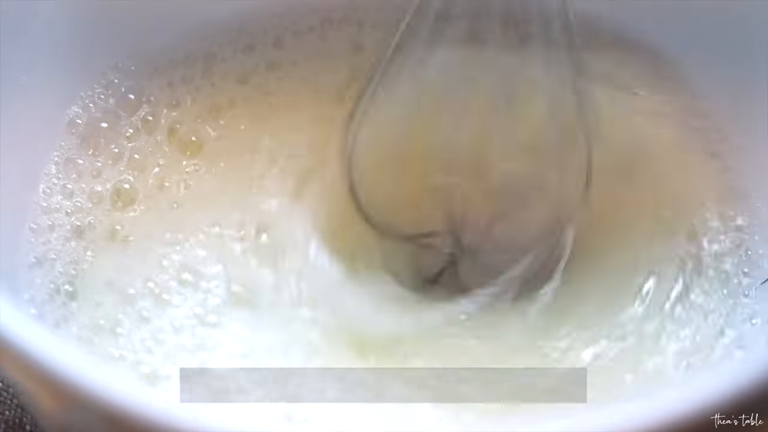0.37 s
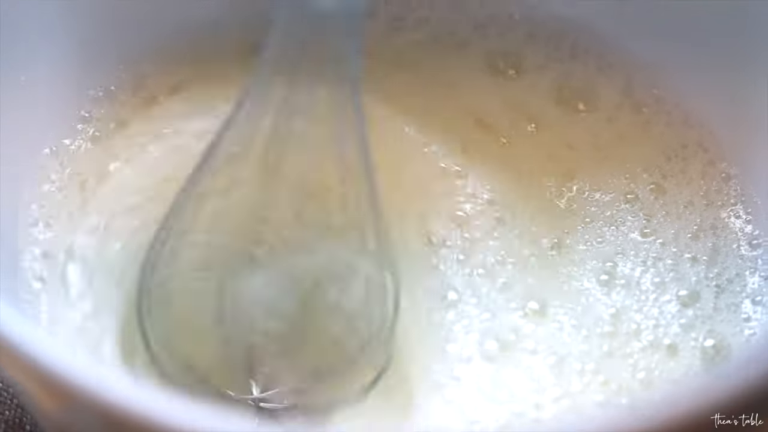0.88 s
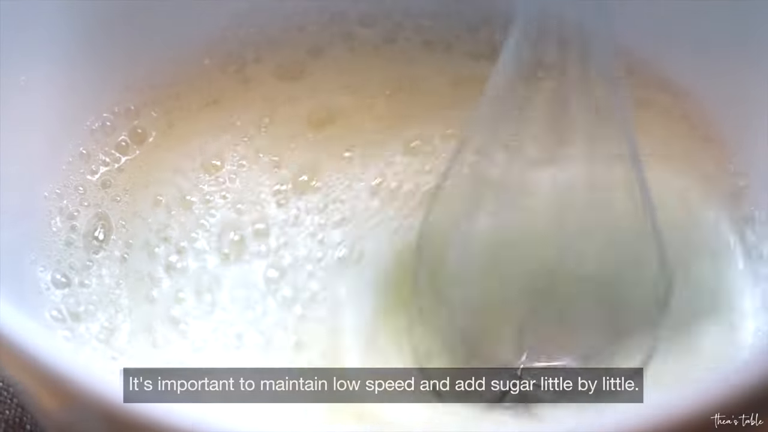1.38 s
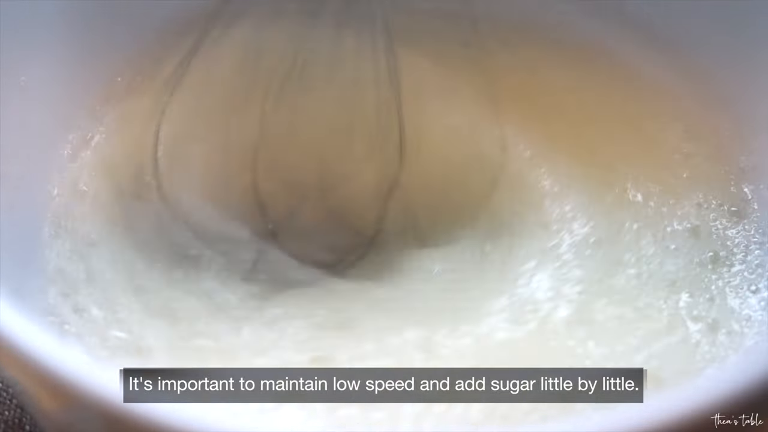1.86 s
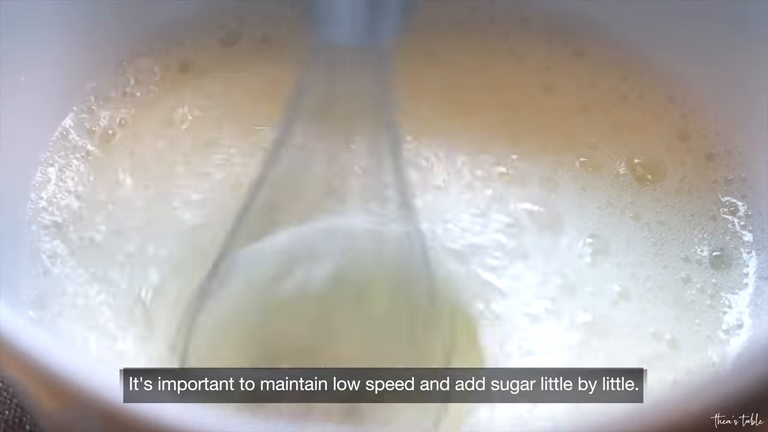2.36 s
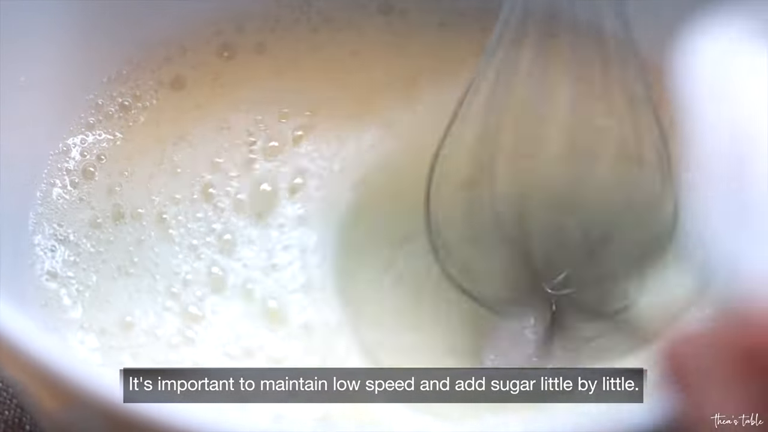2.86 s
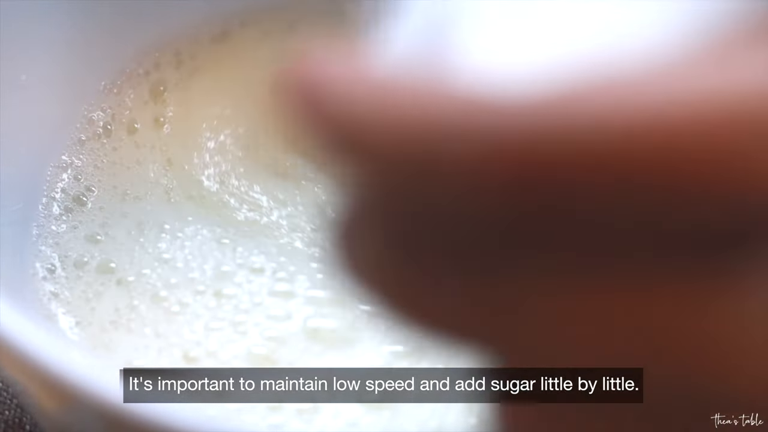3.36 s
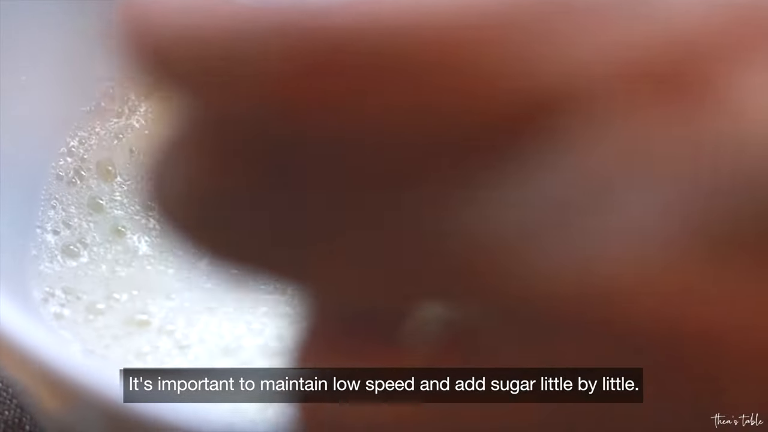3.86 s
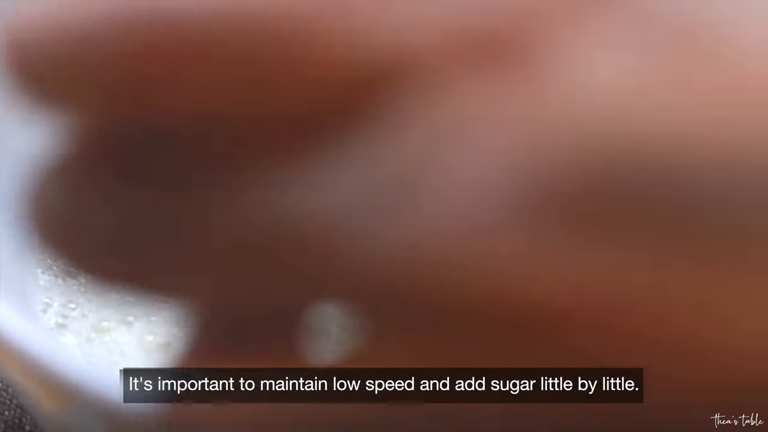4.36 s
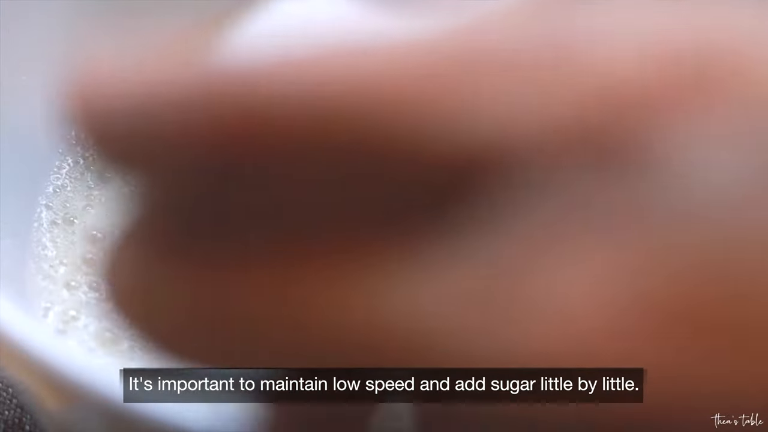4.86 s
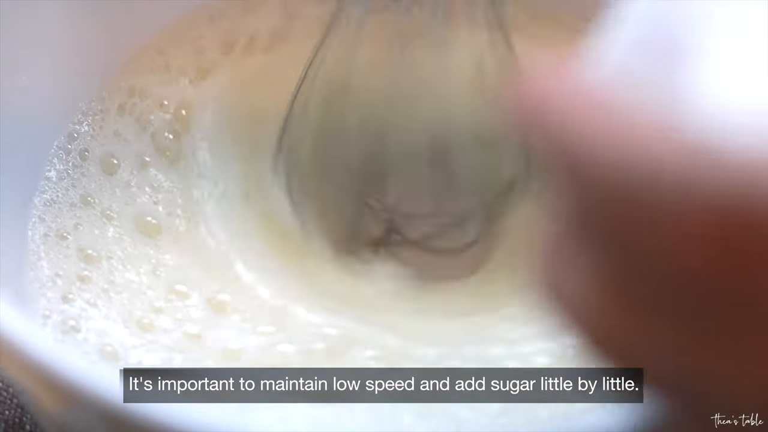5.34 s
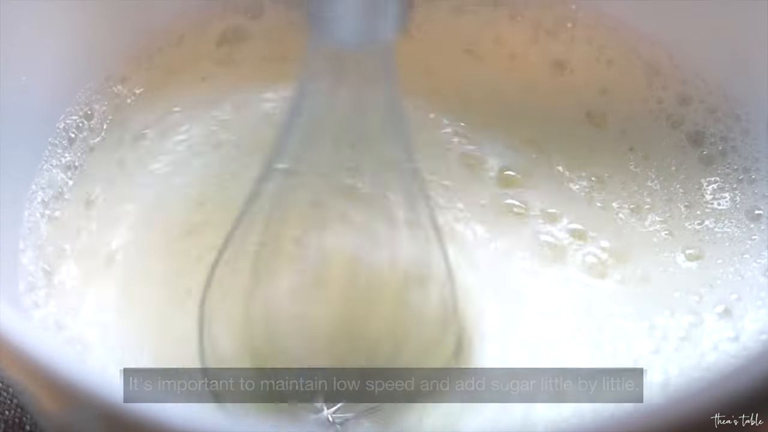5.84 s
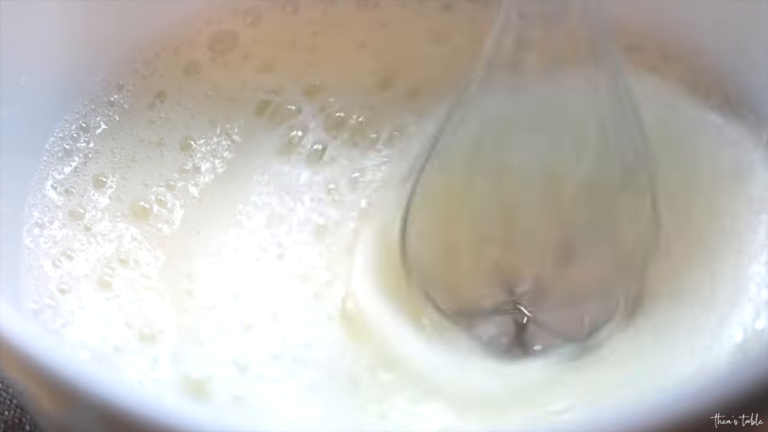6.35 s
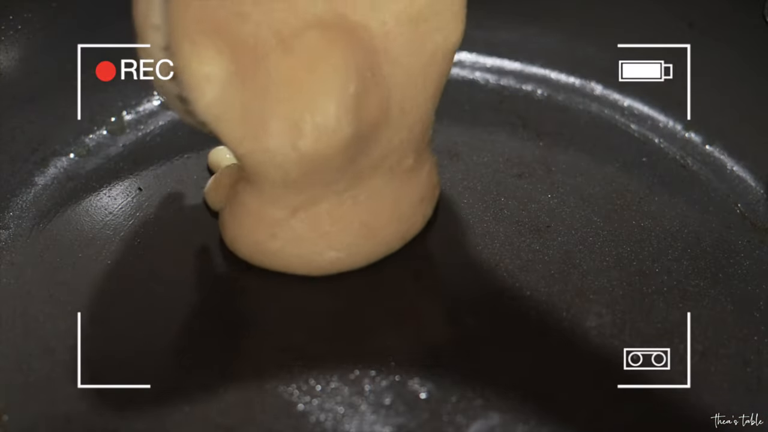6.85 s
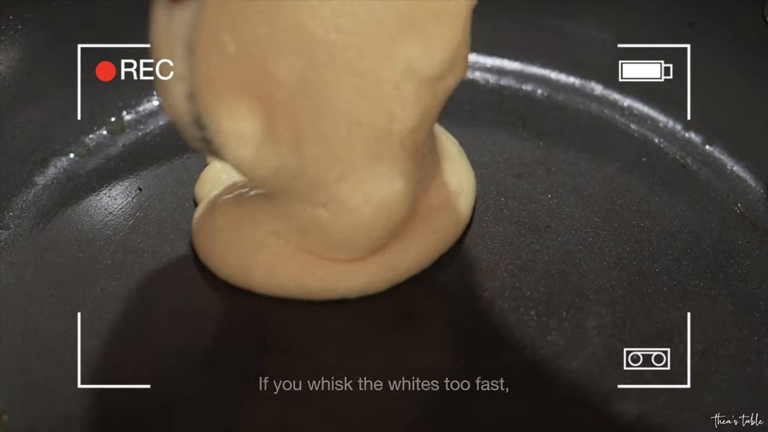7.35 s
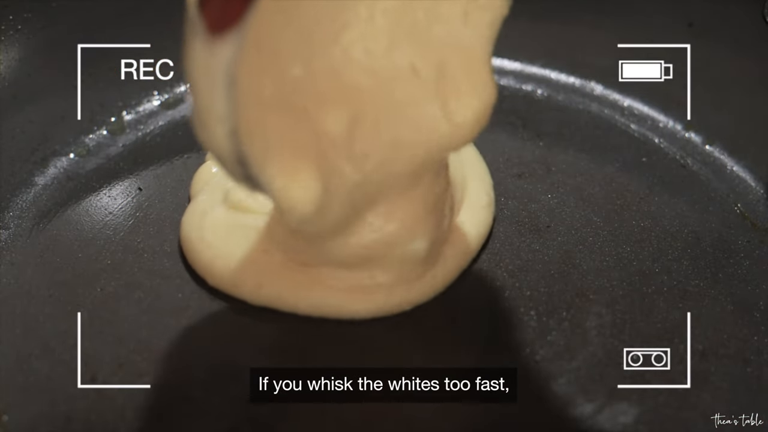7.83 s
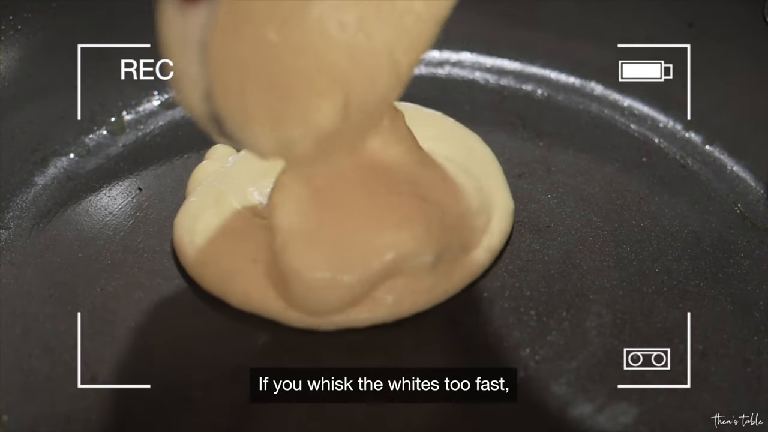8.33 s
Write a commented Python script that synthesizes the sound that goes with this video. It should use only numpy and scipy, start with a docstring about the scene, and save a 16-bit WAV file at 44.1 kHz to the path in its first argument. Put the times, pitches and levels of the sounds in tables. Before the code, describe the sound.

A single close microphone without reverberation picks up a hand mixer beating egg white. Whisk wires strike and drag along the bowl in a fast fluttering rhythm, ringing thin and bright, above a nasal motor whine that dips slightly under load and foamy, gritty liquid noise. Contacts are harder early, gentler in the middle, then firmer briefly. The mixer slowly fades beneath another room's low rumble, and a tiny hiss follows.

```python
"""Hand mixer in a bowl of egg white

Kitchen, one mono microphone, with no added distance or reverberation. An electric hand mixer spins a wire whisk
about 13 turns a second: four wires strike and drag along the wall each turn, as noise bursts that ring resonators
for wires, bowl and motor housing. The motor's whine and gear are sines swelling with the load; the churned liquid
is gritty noise. The kitchen's rumble gives way to another room's low rumble and hums; the mixer fades away and
a soft hiss follows.
"""
import sys
import numpy as np
from scipy import signal
from scipy.fft import rfft, irfft, next_fast_len
from scipy.io import wavfile
from scipy.ndimage import uniform_filter1d, map_coordinates

SR = 44100
rng = np.random.default_rng(int(sys.argv[2]) if len(sys.argv) > 2 else 0)


def master_out(mix):
    """Clip the mix to full scale and print it as 16-bit PCM to the path in sys.argv[1]."""
    frames = np.transpose(np.atleast_2d(mix))
    ceiling = np.clip(frames, -1, 1)
    pcm = np.round(ceiling * 32767).astype(np.int16)
    wavfile.write(sys.argv[1], SR, pcm)


def to_linear_factor(level_db):
    """Convert decibel levels (scalar or array-like) to linear amplitude factors."""
    exponent = np.asarray(level_db, float) / 20
    return 10 ** exponent


N = 384111  # samples

# Kitchen rumble: (time [s], level [dB])
KITCHEN_LEVEL = [(0.0, -72.5), (0.49, -76), (1.66, -70), (1.96, -84), (2.06, -71.5), (2.7, -77.5),
                 (5.47, -76), (6.5, -80)]
# Low rumble of the other room: (time [s], level before its slow waver [dB])
OTHER_ROOM_LEVEL = [(6.55, -120), (6.57, -64), (7.5, -65), (8.2, -64), (8.71, -63.5)]
# Steady hums: (frequency [Hz], width [Hz], start [s], end [s], level [dB])
HUMS = [(118.2, 3.3, 3, 6.55, -76.5), (148.8, 6.65, 6.56, 8, -72), (232, 28, 6.56, 8.25, -69),
        (234, 19, 8.22, 8.8, -63)]
# Noise colours, scaled to rms 1 afterwards: (frequency [Hz], relative density [dB])
KITCHEN_COLOUR = [(12, -50), (20, -9), (48, 9.5), (86, 9.5), (114, 8), (145, 2.5), (320, -7), (420, -34),
                  (500, -56), (700, -120)]
OTHER_ROOM_COLOUR = [(12, -45), (20, -14), (65, -9.5), (141, -12), (233, -14.5), (455, -30), (537, -19),
                     (584, -23.5), (888, -21), (993, -24), (1080, -23.5), (2170, -32), (15700, -34)]
SCUFF_COLOUR = [(1200, -35), (1550, -13), (1820, -6), (2000, -14), (2400, -35)]
CHURN_COLOUR = [(88, -44), (150, -30.5), (492, -16), (621, -7), (684, -9), (1050, -12.5), (1160, -10.5),
                (1640, -11.5), (2380, -7.5), (3500, -12), (3790, -14.5), (4100, -10), (4610, -7.5),
                (8420, -11), (15700, -31)]
SCRAPE_COLOUR = [(150, -54), (400, -3), (900, -1), (1500, -15.5), (2300, 4), (3000, -1), (3800, -6),
                 (4800, -4.5), (7000, -12.5), (10000, -17), (16000, -20)]
TICK_COLOUR = [(3000, -26), (5500, -12), (7500, 0.5), (9500, -0.5), (12000, -0.5), (15500, -7)]

# Mixer at mean load: (time [s], whine [Hz], whine before trim [dB], churn before trim [dB])
MIXER = [(0.0, 609, -59, -45), (0.07, 624, -57.5, -49.5), (.25, 622, -58.5, -49), (0.4, 612, -62, -48),
         (0.85, 613, -59, -47.5), (1.08, 622.8, -59, -49), (1.49, 613.0, -60.5, -48),
         (2.0, 615, -64.5, -52.5), (2.06, 626, -57.5, -46), (2.3, 626, -57.5, -48),
         (2.8, 629.3, -58, -48.5), (3.63, 625.7, -61, -48.5), (5.06, 622, -60, -48.5),
         (5.56, 631, -59.5, -48), (5.9, 628, -60, -48.5), (6.8, 629, -59.5, -48.5),
         (7.1, 624.4, -59.5, -48.5), (7.54, 636, -60.5, -48), (8.25, 625, -58, -49)]
# Motor orders: (multiple of the whine, level over it [dB], random waver [dB], load swell before place factor [dB])
MOTOR_ORDERS = [(1, 0.18, 0.29, 0.93), (1 / 12, -22.5, 2.4, 0), (1 / 3, -23.5, 2.7, 0)]
# Factor on the whine's load swell, one value for each place of the whisk
SWELL_BY_PLACE = [2.6, 1.1, .7]
# Whisk gear: (multiple of tooth rate, level over the mean load at place 0 [dB], at place 1 [dB], at place 2 [dB])
GEAR = [(1, -12, -12.5, -9.5), (2, -4, -0.5, -11), (3, -12, -10.5, -19), (4, -10, -18.5, -23)]

# Whisk in the bowl: (time [s], place: 0 pressed to the wall, 1 on the slope, 2 on the bottom)
PLACE = [(0, 0.21), (2.03, 0.084), (2.08, 0.48), (2.6, 1.38), (3.2, 1.68), (4.2, 2), (5.1, 1.81),
         (5.5, 1.05), (6.45, 1.1), (6.65, 0.18), (7.2, 0.68), (8.25, 1.3)]
# Whisk rotation, the leading wire meeting the wall at each whole turn: (time [s], turns done)
TURNS = [(.005, 0), (.134, 2), (.448, 6), (.681, 9), (.842, 11), (1.08, 14), (1.15, 15), (1.225, 16),
         (1.537, 20), (1.687, 22), (1.769, 23), (2.003, 26), (2.05, 27), (2.358, 31), (2.44, 32),
         (2.587, 34), (4.889, 64), (6.418, 84), (6.729, 88), (6.797, 89), (7.043, 92), (7.426, 97),
         (7.491, 98), (8.167, 107)]
# How the wires bear on the wall: (time [s], leading wire [dB], second wire [dB], third wire [dB],
# opposite wire [dB], second wire's lag [s], body drive over the wires before the offset of each wire [dB])
PRESS = [(0, -45.5, -50, -55, -60, .016, -0.5), (.3, -44.5, -44.5, -49.5, -62, 0.011, -1),
         (.6, -39.5, -38, -55, -48, 0.011, -6), (.78, -44, -39.5, -58, -50, 0.013, 0),
         (.86, -50, -44, -58, -60, 0.01, -1), (1.05, -45.5, -43, -52, -60, 0.0065, -1.5),
         (1.35, -44, -42.5, -54, -60, 0.017, -1), (1.7, -46, -41, -50, -56, .011, -4),
         (1.93, -43.5, -42.5, -58, -62, .011, -6.5), (2.01, -46, -45, -60, -62, 0.0093, -4.5),
         (2.3, -44, -41, -51, -53, 0.01, -2), (2.6, -44, -43, -46.5, -61, 0.019, -0.5),
         (2.95, -47, -44, -49.5, -50, .017, -0.5), (3.4, -47, -48.5, -46, -58, 0.018, -1),
         (3.75, -48.5, -51, -46.5, -60, 0.015, -1), (4.1, -48.5, -51, -47.5, -66, 0.015, 0.5),
         (4.6, -49, -45, -50, -66, 0.016, 0), (5.2, -48, -43, -50, -52, .016, -1),
         (5.5, -45.5, -46, -54, -57, .011, -2), (5.85, -44.5, -42, -49, -60, 0.02, -1),
         (6.2, -52.5, -44.5, -53, -64, 0.015, -0.5), (6.42, -44, -47, -49, -60, 0.012, -3.5),
         (6.5, -51, -50, -58, -47, 0.019, -5), (6.7, -39, -38.5, -52, -46, .019, -11.5),
         (6.9, -43, -49, -53, -48, .012, -4), (7.15, -45.5, -58, -48, -42.5, 0.013, -0.5),
         (7.55, -49.5, -47.5, -58, -47, 0.013, 0.5), (7.8, -47, -47.5, -58, -49, .016, 0),
         (8.2, -48, -47, -58, -58, 0.019, -1)]
# Body drive offset of the leading, second, third and opposite wire [dB]
BODY_BY_WIRE = [0.9, -.7, 0.3, -2.5]
# Single hard knocks of a leading wire: (time [s], wire drive [dB], body drive over the wires [dB])
KNOCKS = [(0.066, -41.5, -8), (.23, -44.5, -4), (.379, -49, -2.5), (.448, -44, -17), (.925, -42.5, -5),
          (1.15, -43.5, -12), (1.845, -41, -20), (2.128, -52, -3.5), (2.445, -51, -3), (5.427, -47, -19),
          (6.265, -53, .4)]
# Body modes of bowl and motor housing (housing: 1279, 1402 and 1493 Hz), drive before trim:
# (frequency [Hz], width [Hz], place 0 [dB], place 1 [dB], place 2 [dB])
BODY_MODES = [(372.7, 45, -10.5, -13.5, -11.5), (903, 170, -7, -19.5, -7.5), (1279, 30, -7.5, -10.5, -6.5),
              (1402, 21, -12, -14.5, -7.5), (1493, 19, -31, -25, -6), (1910, 108, -5.5, -5.5, -13),
              (2094, 86, -2.5, -9.5, -2), (2290, 150, -11, -8.5, -18), (2378, 42, -17, -5, -16),
              (4600, 194, -7, -6.5, -15), (5550, 170, -12, -6, -14.5)]
# High modes of the thin wires, with a bowl ping near 3.5 kHz, drive before trim:
# (frequency [Hz], width [Hz], place 0 [dB], place 1 [dB], place 2 [dB])
HIGH_MODES = [(3474, 36, -12.5, -13.5, -2), (6270, 20, -5, -1.5, -8), (6550, 42, -1, -1.5, -2),
              (7040, 120, -9.5, -4.5, -3), (7250, 28, -4, -10, -18), (7720, 33, -4.5, 1, -10),
              (8196, 78, -5.5, -9.5, 0), (8610, 92, -11.5, -12.5, -20), (8710, 73, -16, -9.5, -4.5),
              (9970, 46, -7, -15, -18), (10700, 200, -11, -8, -14), (11500, 100, -6.5, -13, -10),
              (11500, 69, -21, -12, -25), (12370, 280, -14, -19.5, -7.5), (12850, 70, -11, -14, -12),
              (13740, 130, -6, -23, -4), (14380, 45, -25, -13, -11), (14630, 44, -16, -16, -17),
              (15300, 55, -7, -14, -13), (15500, 60, -11, -15, -6)]
# For each high mode, drive added under fresh contacts and taken off under followers [dB]
FRESH_EMPHASIS = [-1.5, 2, 1, 0, -2, -3, 1.5, -4.5, 1, 3, 0.5, 0.5, -1, 4, -7, 0.5, 0, 2, 0, -3]

GEAR_RATIO = 15 / 8  # tooth rate over the whine's frequency
SAG_HZ = 4.98  # the whine drops by this much when the load on the whisk doubles
THIRD_LAG_S, OPPOSITE_LAG_S = 0.026, 0.038  # after the leading wire
JITTER_S = 0.0012  # standard deviation of the followers' timing
WIRE_SCATTER_DB, BODY_SCATTER_DB = 0.65, 1.2  # standard deviation from strike to strike
SNAP_DB, SNAP_T60_S = 2, 0.02  # the brief hard start of a contact, over its drag
REPEAT_SHARE, WEAR_TURNS = 0.47, 9.01  # power returning each turn; turns in which its pattern is replaced
FADE_START_S, FADE_END_S = 6.33, 8.306


def unit(x):
    """Scaled to rms 1."""
    return x / np.sqrt(np.mean(x ** 2) + 1e-20)


def curves(rows):
    """One value per sample for each column after the time."""
    s, *cols = np.transpose(rows)
    return [np.interp(np.arange(N) / SR, s, c) for c in cols]


def wobble(rate):
    """A smooth random curve, rate knots a second."""
    knots = rng.standard_normal(int(N * rate / SR) + 4)
    return map_coordinates(knots, [np.arange(N) * rate / SR])


def noise(colour, rough_db=0, white=None):
    """Coloured noise of rms 1, made gritty by a fast random gain."""
    if white is None:
        white = rng.standard_normal(N)
    m = next_fast_len(N)
    hz, db = np.transpose(colour)
    gain = to_linear_factor(np.interp(np.log(np.fft.rfftfreq(m, 1 / SR) + 1), np.log(hz), db))
    gritty = white * to_linear_factor(rough_db * wobble(1000))
    return unit(irfft(rfft(gritty, m) * gain, m)[:N])


def resonate(x, hz, width_hz):
    """One damped mode: a resonance whose width sets how long it rings."""
    return signal.lfilter(*signal.iirpeak(hz, hz / width_hz, SR), x)


def at_place(place, levels_db):
    """Level while the whisk moves between the three places, interpolated in dB."""
    return np.interp(place, np.arange(len(levels_db)), levels_db)


def rooms():
    """Low rumble of the kitchen, then rumble of the other room, as coloured noise; hums are narrow noise."""
    t = np.arange(N) / SR
    out = to_linear_factor(curves(KITCHEN_LEVEL)[0]) * (t < OTHER_ROOM_LEVEL[0][0]) * noise(KITCHEN_COLOUR)
    out += to_linear_factor(curves(OTHER_ROOM_LEVEL)[0] + 1.4 * wobble(5.3)) * noise(OTHER_ROOM_COLOUR)
    for hz, width_hz, start, end, db in HUMS:
        hum = unit(resonate(rng.standard_normal(N), hz, width_hz))
        gate = np.clip(np.minimum(t - start, end - t) / 0.019, 0, 1)
        out += to_linear_factor(db) * hum * gate
    return out


def scuff(at_s=8.545, half_s=0.033):
    """A short soft narrow hiss: band noise under a bell-shaped swell."""
    swell = np.exp(-0.5 * ((np.arange(N) / SR - at_s) / half_s) ** 2)
    return to_linear_factor(-63) * swell * noise(SCUFF_COLOUR)


def rough():
    """White roughness of wires on the wall: part of it comes back with every turn, slowly changing."""
    t = np.arange(N) / SR
    s, done = np.transpose(TURNS)
    turn = np.interp(t, s, done)
    samples_per_turn = round(SR * (s[-1] - s[0]) / done[-1])  # in a mean turn
    patterns = rng.standard_normal((40, samples_per_turn))
    age = np.clip(turn / WEAR_TURNS, 0, 38)
    k = age.astype(int)
    spot = (turn % 1 * samples_per_turn).astype(int)
    mix = np.pi / 2 * (age % 1)  # equal-power crossfade to the next pattern
    again = np.cos(mix) * patterns[k, spot] + np.sin(mix) * patterns[k + 1, spot]
    share = REPEAT_SHARE * (t < s[-1])
    return np.sqrt(share) * again + np.sqrt(1 - share) * rng.standard_normal(N)


def liquid(churn_db, wall):
    """Churned egg white: gritty noise that each turn also heaves, so it swells with the wall contact."""
    relative_load = wall / (uniform_filter1d(wall, size=10000) + 1e-6)
    stir = np.sqrt(0.72 + 0.14 * relative_load)
    level = to_linear_factor(churn_db - 2.0 + 0.43 * wobble(9.9))
    return stir * level * noise(CHURN_COLOUR, rough_db=1.5, white=rough())


def motor(whine_hz, whine_db, wall, place):
    """Motor whine and shaft orders, sagging in pitch under load; the whisk's gear sings when the wall loads it."""
    load = uniform_filter1d(wall, size=900)
    mean_load = uniform_filter1d(wall, size=10000) + 1e-6
    swell = load / mean_load - 1
    hz = whine_hz - SAG_HZ * np.clip(swell, -1, 1.5) + 0.79 * wobble(40)
    cycles = np.cumsum(hz) / SR
    out = np.zeros(N)
    for k, db, waver_db, load_db in MOTOR_ORDERS:
        load_swell_db = load_db * at_place(place, SWELL_BY_PLACE) * swell
        level = to_linear_factor(whine_db + 3.5 + db + waver_db * wobble(9) + load_swell_db)
        out += level * np.sin(2 * np.pi * (k * cycles + rng.random()))
    slip = np.cumsum(4 * wobble(50)) / SR  # tooth play blurs the higher multiples most
    tooth_cycles = GEAR_RATIO * cycles + slip
    for k, *levels_db in GEAR:
        gear_db = at_place(place, levels_db) + 0.78 * wobble(30) + 3.7 * k * np.clip(swell, -1, 1.2)
        out += mean_load * to_linear_factor(gear_db) * np.sin(2 * np.pi * (k * tooth_cycles + rng.random()))
    return out


def strikes():
    """Four wires meet the wall in every turn: times, wire dB and wall dB, one row for each wire."""
    s, done = np.transpose(TURNS)
    start = np.interp(np.arange(done[-1] + 1), done, s)
    at, *cols = np.transpose(PRESS)
    *wire_db, lag, body_db = (np.interp(start, at, c) for c in cols)
    chance = rng.standard_normal((len(start), 3, 4)).T
    lags = np.array([0 * lag, lag, 0 * lag + THIRD_LAG_S, 0 * lag + OPPOSITE_LAG_S])
    times = start + lags + JITTER_S * chance[:, 0] * (lags > 0)
    wire_db = wire_db + WIRE_SCATTER_DB * chance[:, 1]
    wall_db = wire_db + body_db + np.c_[BODY_BY_WIRE] + BODY_SCATTER_DB * chance[:, 2]
    return times, wire_db, wall_db


def bursts(times, db, attack, t60):
    """Envelope of contacts that start fast and die away; their powers add. Attack and t60 in seconds."""
    t = np.arange(SR // 8) / SR
    power = np.bincount(np.round(times * SR).astype(int), to_linear_factor(2 * db), N)
    drag = to_linear_factor(-120 * t / t60)
    snap = to_linear_factor(2 * SNAP_DB - 120 * t / SNAP_T60_S)
    shape = (1 - np.exp(-t / attack)) * (drag + snap)
    return np.sqrt(np.abs(signal.oaconvolve(power, shape)[:N]))


def contact():
    """How hard the strikes drive the high modes (fresh contacts, followers) and the wall."""
    s, wire_db, wall_db = strikes()
    knock_s, knock_db, body_db = np.transpose(KNOCKS)
    fresh_s = np.r_[s[0], s[3], knock_s]  # leading and opposite wires, and knocks
    fresh_db = np.r_[wire_db[0], wire_db[3], knock_db]
    fresh = bursts(fresh_s, fresh_db, attack=0.0049, t60=0.12)
    followers = bursts(s[1:3].ravel(), wire_db[1:3].ravel(), attack=0.0047, t60=0.11)
    all_s = np.r_[s.ravel(), knock_s]
    all_db = np.r_[wall_db.ravel(), knock_db + body_db]
    wall = bursts(all_s, all_db, attack=0.0064, t60=0.13)
    return fresh, followers, wall


def ring(modes, pushes, place, scatter_db, rate, grit_db):
    """Rough contact drives each mode; its share wavers at random and follows the whisk's place."""
    grit = unit(rough() * to_linear_factor(grit_db * wobble(900)))
    out = np.zeros(N)
    for (hz, width_hz, *levels_db), push in zip(modes, pushes):
        share = to_linear_factor(at_place(place, levels_db) + scatter_db * wobble(rate))
        out += resonate(share * push * grit, hz, width_hz)
    return out


def whisk(fresh, followers, wall, place, churn_db):
    """Each strike ticks, scrapes and rings the high modes of wires and bowl and the body modes below them."""
    drag = np.hypot(wall, to_linear_factor(churn_db - 5.5))  # the wires also rub the wall between strikes
    tick = to_linear_factor(-2.5) * np.hypot(fresh, followers) * noise(TICK_COLOUR, rough_db=1.0, white=rough())
    scrape = to_linear_factor(-2.5) * wall * noise(SCRAPE_COLOUR, rough_db=1.5, white=rough())
    pushes = (np.hypot(to_linear_factor(db) * fresh, to_linear_factor(-db) * followers) for db in FRESH_EMPHASIS)
    high = to_linear_factor(18.5) * ring(HIGH_MODES, pushes, place, scatter_db=2.0, rate=35, grit_db=4.5)
    body_pushes = [drag] * len(BODY_MODES)
    body = to_linear_factor(15.5) * ring(BODY_MODES, body_pushes, place, scatter_db=1.0, rate=13, grit_db=3.5)
    return tick + scrape + high + body


def scene():
    """Rooms, liquid and mixer at one microphone; the mixer and its liquid fade out linearly."""
    whine_hz, whine_db, churn_db = curves(MIXER)
    place = curves(PLACE)[0]
    fresh, followers, wall = contact()
    background = rooms() + scuff()
    mixer = liquid(churn_db, wall) + motor(whine_hz, whine_db, wall, place)
    mixer += whisk(fresh, followers, wall, place, churn_db)
    fade = np.clip((FADE_END_S - np.arange(N) / SR) / (FADE_END_S - FADE_START_S), 0, 1)
    return (background + fade * mixer)[None]


def roll_off(x):
    """The treble ends steeply here."""
    return signal.sosfilt(signal.butter(12, 15850, fs=SR, output="sos"), x)


def record(dry):
    """Band limit of the recorder: the treble rolls off from 15.7 kHz to nothing at 15.8 kHz."""
    m = next_fast_len(N)
    kept = np.clip((15800 - np.fft.rfftfreq(m, 1 / SR)) / 100, 0, 1) ** 2
    mix = irfft(rfft(dry, m) * kept, m)[:, :N]
    return roll_off(mix)


dry = scene()
out = record(dry)
master_out(out)
```